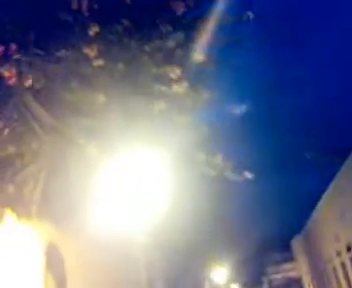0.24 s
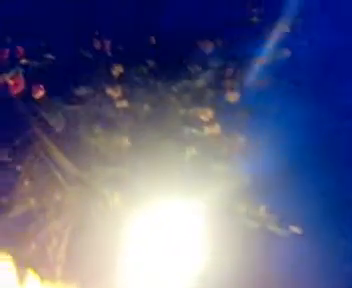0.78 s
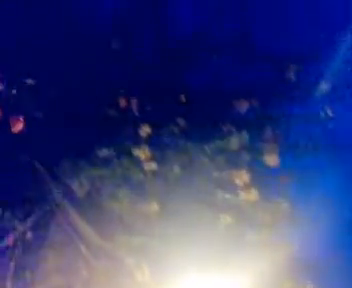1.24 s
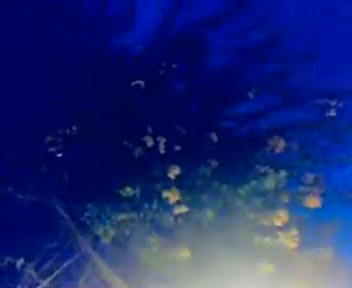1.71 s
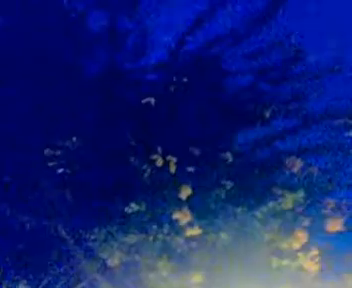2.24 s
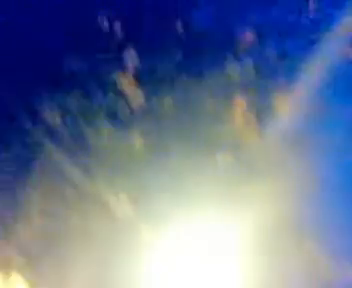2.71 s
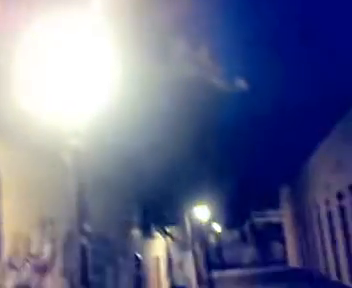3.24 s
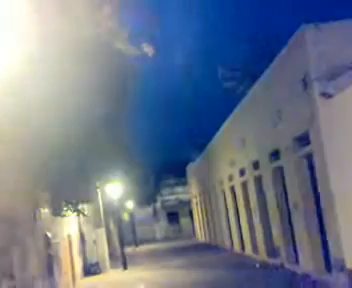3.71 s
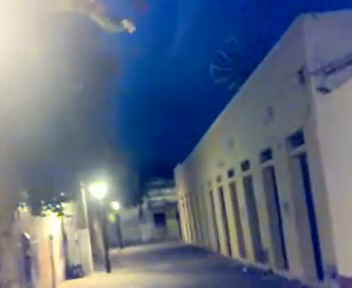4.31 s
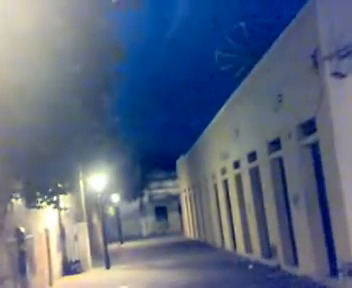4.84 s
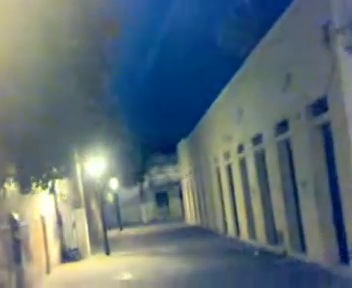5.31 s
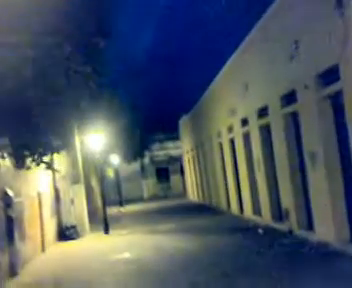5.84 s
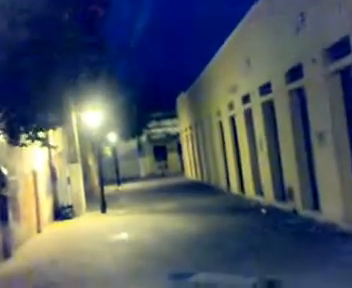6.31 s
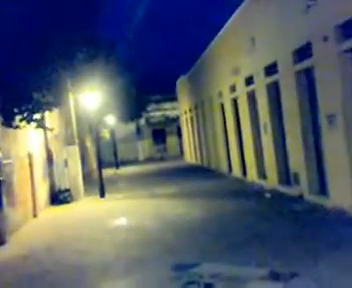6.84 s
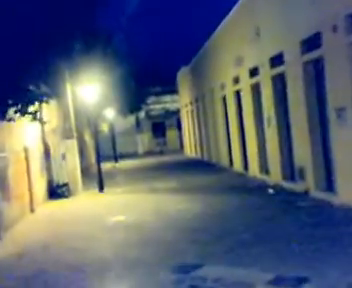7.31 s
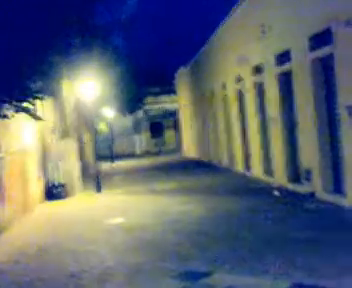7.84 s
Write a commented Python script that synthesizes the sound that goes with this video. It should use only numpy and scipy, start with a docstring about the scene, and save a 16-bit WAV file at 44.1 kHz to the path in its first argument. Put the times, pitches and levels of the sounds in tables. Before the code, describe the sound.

A crowded tree roost cheeps and chips nonstop, echoing off house fronts, with sharper near whistles, faint raspy squawks and a faint town hum.

```python
"""In a walled street at dawn, hundreds of small birds chirp at once in the trees, in swelling waves.
Each bird note is a sine with a bending pitch; random echo tails stand for the house fronts that blur it.
A few near whistles and some lower, raspy squawks stand out from the crowd.
The hand-held mono camera adds soft low thumps, rumbling noise and ringing ticks.
Far off the town hums: coloured noise for traffic, slightly unsteady sines for machinery."""
import sys
import numpy as np
from scipy import signal
from scipy.fft import rfft, irfft, next_fast_len
from scipy.io import wavfile
from scipy.ndimage import map_coordinates

SR = 44100
rng = np.random.default_rng(int(sys.argv[2]) if len(sys.argv) > 2 else 0)


def waveform_to_disk(signal):
    """Save audio, clipped to [-1, 1], as 16-bit WAV at the path in sys.argv[1]."""
    frames = np.transpose(np.atleast_2d(signal))
    scaled = np.clip(frames, -1, 1) * 32767
    samples = np.round(scaled).astype(np.int16)
    wavfile.write(sys.argv[1], SR, samples)


N = 355446  # length [samples]
T = np.arange(N) / SR  # time of every sample [s]


def amp(db):
    """Turn decibels into gain."""
    return 10 ** (np.asarray(db) / 20)


def unit(x):
    """Scale a sound to an rms of 1."""
    return x / np.sqrt(np.mean(x ** 2) + 1e-20)


def curves(rows):
    """Join the rows with straight lines: one curve for each column after the time."""
    times, *columns = np.transpose(rows)
    return [np.interp(T, times, column) for column in columns]


def wobble(rate):
    """A smooth random curve through `rate` random points a second."""
    points = rng.standard_normal(int(N * rate / SR) + 4)
    return map_coordinates(points, [T * rate])


def filtered(x, response):
    """Change the strength of each frequency by the gain that response gives for it."""
    size = next_fast_len(N + 8192)
    spectrum = rfft(x, size) * response(np.fft.rfftfreq(size, 1 / SR))
    return irfft(spectrum, size)[:N]


def coloured(x, points):
    """Filter through (frequency, gain) points, falling away outside them, then scale to rms 1."""
    f, db = np.transpose(points)
    f = np.r_[f[0] / 2, f, f[-1] * 2]
    db = np.r_[-90, db, -90]
    return unit(filtered(x, lambda hz: amp(np.interp(np.log(hz + 1), np.log(f), db))))


def add(track, s, sound):
    """Mix a sound into the track at time s, cut off at the track's end."""
    part = track[round(s * SR):][:len(sound)]
    part += sound[:len(part)]


def note(hz, length, arch, slide, trill, trill_hz):
    """One note of a bird's voice: the pitch arches, slides and flutters under a rounded swell."""
    t = np.arange(int(length * SR)) / SR
    u = 2 * t / length - 1  # runs from -1 to 1 through the note
    flutter = trill * np.sin(2 * np.pi * trill_hz * t)
    pitch = hz * np.exp(slide * u - arch * u * u + flutter)
    return (1 - u * u) * np.sin(2 * np.pi * np.cumsum(pitch) / SR)


def street(x, wet_db, t60):
    """Add the echo between house fronts; calls come from ever new perches, so the echo keeps changing."""
    size = SR // 5
    t = T[:SR * 2 // 3]
    decay = amp(-60 * t / t60) * (1 - np.exp(-t / 0.019))  # builds up, then dies away
    # overlapping pieces of the sound, each with its own random echo tail
    padded = np.pad(x, (0, size))
    pieces = np.lib.stride_tricks.sliding_window_view(padded, size)[::size // 2]
    tails = rng.standard_normal((len(pieces), len(t))) * decay / np.linalg.norm(decay)
    answers = signal.fftconvolve(pieces * signal.windows.cosine(size), tails, axes=1)
    echo = np.zeros(len(x))
    for k, answer in enumerate(answers):
        add(echo, k * (size // 2) / SR, answer)
    return x + amp(wet_db) * echo


def flock(low_hz, high_hz, length, sweep, fall, trill, spread_db, wet_db, count):
    """Many birds fill the band evenly, each chirp with its own shape and loudness, echoing in the street."""
    lead = SR // 2  # they are already singing at the start
    voices = np.zeros(N + lead)
    turns = (np.arange(count) + rng.random(count)) / count * len(voices) / SR
    # every ten chirps in a row use each tenth of the band once
    tenths = np.argsort(rng.random((count // 10 + 1, 10))).ravel()[:count]
    pitches = low_hz + (high_hz - low_hz) * (tenths + rng.random(count)) / 10
    shapes = rng.uniform(-0.995, 1, (count, 5))
    for s, hz, (size, bend, lean, flutter, near) in zip(turns, pitches, shapes):
        chirp = note(hz, length * 2 ** size, arch=sweep * bend, slide=sweep * lean - fall,
                     trill=trill * (1 + flutter), trill_hz=150 * 2 ** bend)
        add(voices, s, amp(spread_db * near) * chirp)
    return unit(street(voices, wet_db, t60=0.99)[lead:])


FLURRY_ATTACK_S, FLURRY_T60_S = 0.034, .3  # time to swell up; time to fall by 60 dB


def flurry(s, length):
    """A group of birds joins in and calls together, then its calls die away in the street."""
    age = T - s
    fade_db = -60 * np.clip(age - length, 0, 2) / FLURRY_T60_S
    return np.clip(age / FLURRY_ATTACK_S, 0, 1) * amp(fade_db)


# Tone filters of the full cheeps and of the thin chips: (frequency [Hz], relative gain [dB])
CHEEP_TONE = [(1700, -40), (2200, -26), (2650, -16), (2950, -8), (3200, -3.5), (3600, 1), (4000, -3),
              (4400, -7), (4900, -13), (6000, -44)]
CHIP_TONE = [(3400, -16), (4000, -3.5), (4500, -0.5), (5000, -2), (5600, -6), (6100, -13), (6400, -17),
             (7000, -20.5), (7400, -24.5)]
# Cheeping of the steady din, softer once the camera turns from the tree to the street:
# (time [s], level before wavering [dB])
DIN_LEVELS = [(0, -23.5), (2.4, -25), (3.4, -26.5), (5.5, -25.5), (7.2, -26), (8.06, -27)]
# Groups of birds calling together:
# (time [s], time until the calls start to fade [s], cheeping level [dB], chipping level [dB])
GROUP_CALLS = [(0, 0.059, -30, -25), (0.177, .04, -41, -25), (0.233, .045, -24.5, -34),
               (0.48, .05, -23.5, -44), (.7, 0.05, -30, -32), (0.857, .18, -24.5, -31),
               (1.083, .18, -28, -29.5), (1.284, 0.18, -29, -31), (1.532, 0.19, -29, -29),
               (1.714, 0.073, -23.5, -44), (1.84, .16, -23, -28.5), (2.038, 0.097, -25, -26.5),
               (2.14, 0.11, -29, -26), (2.258, 0.078, -23.5, -35.5), (2.369, 0.072, -25, -31),
               (2.547, 0.095, -38, -25.5), (2.756, 0.22, -23.5, -27.5), (2.946, 0.091, -25.5, -23),
               (3.023, 0.14, -27, -26.5), (3.234, 0.099, -26.5, -43), (3.452, 0.1, -47, -27.5),
               (3.637, .137, -26.5, -31), (3.92, .16, -26, -39), (4.36, 0.17, -25, -28),
               (4.637, 0.16, -26.5, -33), (5.12, 0.12, -26, -43), (5.314, 0.053, -27, -34),
               (5.547, 0.08, -29.5, -33), (5.714, 0.084, -37, -31.5), (6.19, 0.029, -26, -31),
               (6.384, .11, -24, -31.5), (6.645, 0.14, -29.5, -33), (6.888, 0.081, -25, -27.5),
               (7.49, .14, -26, -33.5), (7.635, 0.071, -30, -28.5), (7.718, 0.05, -23, -34)]
CHIP_DB, DIN_WAVER_DB = -3.5, 0.62  # the din's chipping relative to its cheeping; chance wavering of each


def roost():
    """The crowd in the trees: full cheeps, quicker thin chips and the nearest tree's longer chirps."""
    din_db, = curves(DIN_LEVELS)
    cheep_power = amp(din_db + DIN_WAVER_DB * wobble(9)) ** 2
    chip_power = amp(din_db + CHIP_DB + DIN_WAVER_DB * wobble(10)) ** 2
    # flurries add their power to the din
    for s, length, cheep_db, chip_db in GROUP_CALLS:
        swell = flurry(s, length)
        cheep_power += (amp(cheep_db) * swell) ** 2
        chip_power += (amp(chip_db) * swell) ** 2
    cheeps = flock(2000, 5400, length=.024, sweep=0.1595, fall=0.0404, trill=0.02,
                   spread_db=3.0, wet_db=-1.5, count=5200)
    chips = flock(3500, 7900, length=.022, sweep=.12, fall=0.024, trill=0.011,
                  spread_db=2.5, wet_db=1, count=4400)
    nearest = flock(3400, 6000, length=.036, sweep=0.0594, fall=0.0354, trill=0.014,
                    spread_db=3.0, wet_db=-5.0, count=480)
    cheeps = coloured(cheeps + amp(-10.5) * nearest, CHEEP_TONE)
    chips = coloured(chips + amp(-8.0) * nearest, CHIP_TONE)
    return np.sqrt(cheep_power) * cheeps + np.sqrt(chip_power) * chips


# Near whistles: (time [s], middle pitch [Hz], length [s], peak level before unsteadiness and echo [dB])
NEAR_WHISTLES = [(0.747, 5350, 0.033, -26), (0.894, 6100, 0.038, -24), (1.002, 3620, 0.037, -19),
                 (1.128, 3850, 0.017, -19.5), (1.24, 5450, 0.022, -22), (1.323, 5220, .07, -31),
                 (1.59, 6050, 0.056, -33), (1.745, 3380, .035, -20), (1.894, 5980, 0.12, -35),
                 (2.04, 5970, 0.021, -23), (2.085, 3600, 0.014, -22.5), (2.604, 5050, 0.041, -26.5),
                 (2.758, 4280, 0.028, -20), (2.805, 6100, 0.024, -22), (3.428, 6170, 0.049, -37),
                 (3.516, 4960, 0.045, -29), (4.086, 4800, 0.042, -25.5), (4.3, 5800, .05, -35),
                 (4.78, 5650, 0.08, -33), (4.9, 5650, .06, -34), (5.163, 5120, 0.02, -26),
                 (5.76, 5300, .05, -30), (6.229, 4230, 0.03, -22), (6.364, 6200, .045, -41),
                 (7.233, 6280, .05, -39), (7.605, 5850, 0.044, -31.5), (7.675, 5020, 0.036, -25.5)]


def whistlers():
    """Near birds: short, almost level notes with an unsteady loudness and a short echo."""
    notes = np.zeros(N)
    for s, hz, length, db in NEAR_WHISTLES:
        whistle = note(hz, length, arch=0.024, slide=0.0095, trill=0.016, trill_hz=129)
        add(notes, s, amp(db) * whistle)
    unsteady = unit(1 + .45 * wobble(250))
    return street(notes * unsteady, wet_db=-3.5, t60=0.2)


# Tone filter of the far chatter: (frequency [Hz], relative gain [dB])
CHATTER_TONE = [(800, -26), (1200, -6), (1600, -0.5), (2000, -3.5), (2400, 5), (3000, -9.5)]
# Single low squawks: (time [s], middle pitch [Hz], peak level before rasp and echo [dB])
SINGLE_SQUAWKS = [(0.201, 1780, -46.5), (.44, 1930, -48.5), (0.599, 2020, -43.5), (0.991, 2320, -42),
                  (1.91, 1103, -48.5), (2.25, 1900, -46.5), (2.78, 1806, -45.5), (3.34, 1825, -46),
                  (3.56, 1710, -47), (3.735, 1890, -41.5), (3.78, 2310, -38), (4.48, 2050, -40.5),
                  (4.73, 1855, -43.5), (4.96, 2440, -37), (5.301, 1780, -45.5), (5.53, 1784, -43.5),
                  (5.87, 1910, -45), (6.389, 1880, -41.5), (6.77, 2080, -43.5), (7.39, 2220, -43),
                  (7.82, 2120, -41.5)]
CHATTER_DB, CHATTER_WAVER_DB = -50, 1.5  # level of the far chatter; its chance wavering


def squawkers():
    """Larger birds: a far chatter and single calls, made raspy by a fast-changing loudness."""
    far = flock(900, 3000, length=.055, sweep=0.1404, fall=.03, trill=0.073,
                spread_db=5, wet_db=0.0, count=1200)
    chatter = amp(CHATTER_DB + CHATTER_WAVER_DB * wobble(6)) * coloured(far, CHATTER_TONE)
    rasp = unit(1 + 1.4 * wobble(700))
    calls = np.zeros(N)
    for s, hz, db in SINGLE_SQUAWKS:
        squawk = note(hz, 0.079, arch=.07, slide=rng.normal(0, .04),
                      trill=0.07, trill_hz=rng.uniform(72, 130))
        add(calls, s, amp(db) * squawk)
    return chatter + street(calls * rasp, wet_db=-4.0, t60=0.31)


# Tone of the hand's rumble: (frequency [Hz], relative level per Hz [dB])
RUMBLE_TONE = [(15, 0.5), (28, 1.5), (50, -3), (90, -15.5)]
# The hand bumps the camera: (time [s], pitch [Hz], peak level of the swell [dB])
HAND_BUMPS = [(1.432, 59.6, -33), (1.477, 45, -38), (1.557, 39.3, -31.5), (1.77, 35, -50),
              (2.5, 25.6, -42.5), (4.23, 26.3, -41), (4.683, 42.5, -31.5), (5.38, 25.9, -41),
              (5.44, 48, -39.5), (6.84, 27.6, -50)]
# Ticks and knocks of the camera's case: (time [s], peak level [dB], pitch ratio to the case's tones [1])
CASE_TICKS = [(1.3717, -20, 1), (2.959, -32.5, .47), (4.471, -35, 0.6), (6.652, -36, 0.59)]
# Ringing tones of the case at pitch ratio 1:
# (frequency [Hz], relative level [dB], time to fall by 60 dB [s])
CASE_TONES = [(1090, -12, .014), (1340, 0, 0.0091), (1700, -1, 0.014), (2250, -12, .005)]
GRIP_DB, GRIP_WAVER_DB = -63.5, 2.5  # rumble of the resting hand; its chance wavering
# the hand slips around each bump: rumble relative to the bump, fading before and after
SLIP_DB, SLIP_FADE_DB_PER_S = -17, 76


def handling():
    """Soft pushes rock the camera for a cycle or two, the grip rumbles around them, and the case ticks."""
    grip = amp(GRIP_DB + GRIP_WAVER_DB * wobble(3.7))
    for s, _, db in HAND_BUMPS:
        grip += amp(db + SLIP_DB - SLIP_FADE_DB_PER_S * np.abs(T - s))
    out = grip * coloured(rng.standard_normal(N), RUMBLE_TONE)
    t = T[:SR // 4]
    for s, hz, db in HAND_BUMPS:
        u = t * hz / 0.54  # the swell peaks after 0.54 of a cycle
        swell = u * np.exp(1 - u)
        add(out, s, amp(db) * swell * np.sin(2 * np.pi * hz * t))
    for s, db, ratio in CASE_TICKS:
        # lower knocks also ring longer
        ring = sum(amp(level - 60 * t * ratio / t60) * np.cos(2 * np.pi * hz * ratio * t)
                   for hz, level, t60 in CASE_TONES)
        add(out, s, amp(db) * ring / np.abs(ring).max())
    return out


# Tone of the far traffic: (frequency [Hz], relative level per Hz [dB])
TRAFFIC_TONE = [(20, -14), (45, -3.5), (80, -1), (105, -4), (145, -6), (210, -1.5), (280, -8), (450, -10),
                (750, -13.5), (1200, -14), (2500, -9), (7000, -23.5)]
# Distant machinery: (frequency [Hz], rms level before wavering [dB])
MACHINE_HUM = [(64.6, -60), (87, -59.5), (120, -58.5), (178, -64.5), (537, -72.5), (623, -70.5)]


def town():
    """Far traffic as coloured noise, machinery as sines that waver slightly in level and phase."""
    hum = np.zeros(N)
    for hz, db in MACHINE_HUM:
        level = amp(db + 0.6 * wobble(2.4)) * np.sqrt(2)  # rms to peak
        hum += level * np.sin(2 * np.pi * hz * T + 1.1 * wobble(3))
    traffic = amp(-45.5) * coloured(rng.standard_normal(N), TRAFFIC_TONE)
    return hum + traffic


def scene():
    """One microphone feeds both channels."""
    mono = roost() + whistlers() + squawkers() + handling() + town()
    return np.tile(mono, (2, 1))


TOP_HZ = 7560  # middle of the camera's upper cutoff


def record(dry):
    """The camera cuts the treble, with a slope 200 Hz wide around its band limit."""
    def cutoff(hz):
        return np.clip((TOP_HZ - hz) / 200 + .5, 0, 1)
    return np.array([filtered(x, cutoff) for x in dry])


dry = scene()
out = record(dry)
waveform_to_disk(out)
```